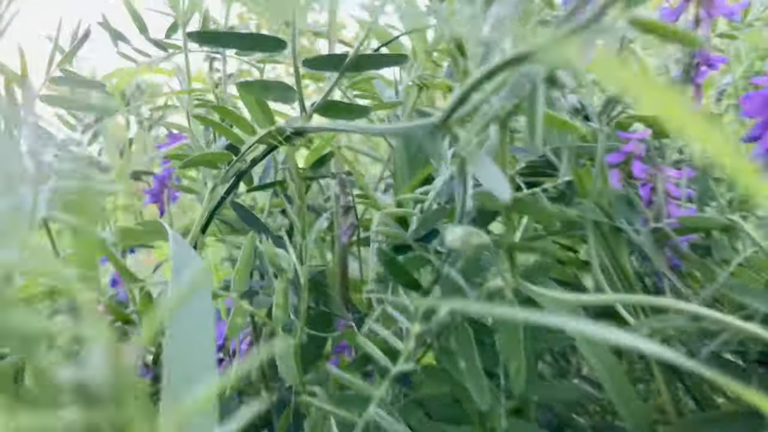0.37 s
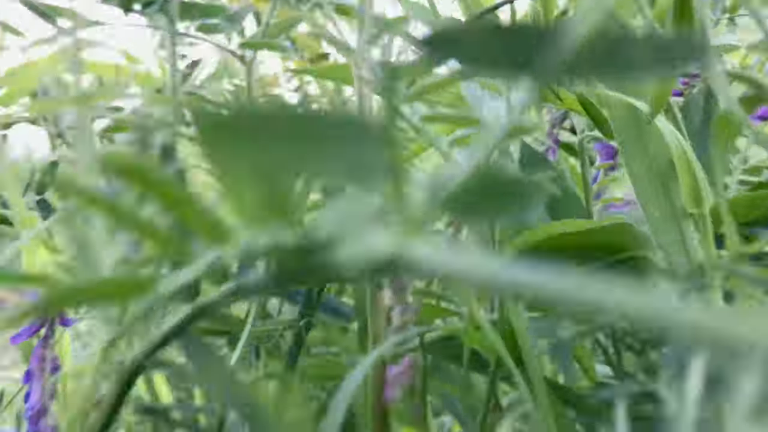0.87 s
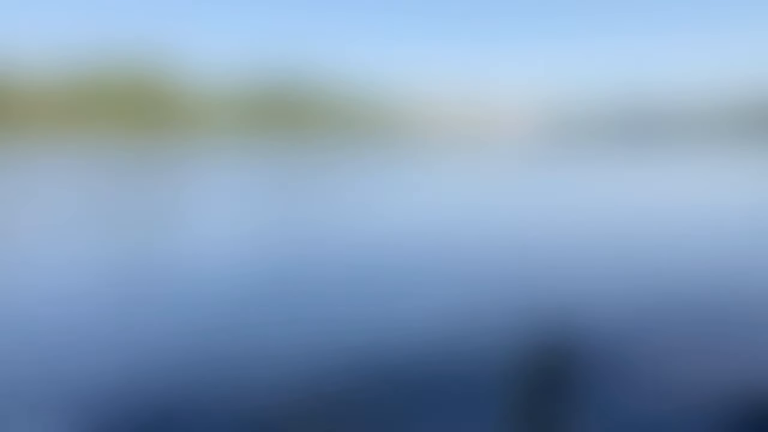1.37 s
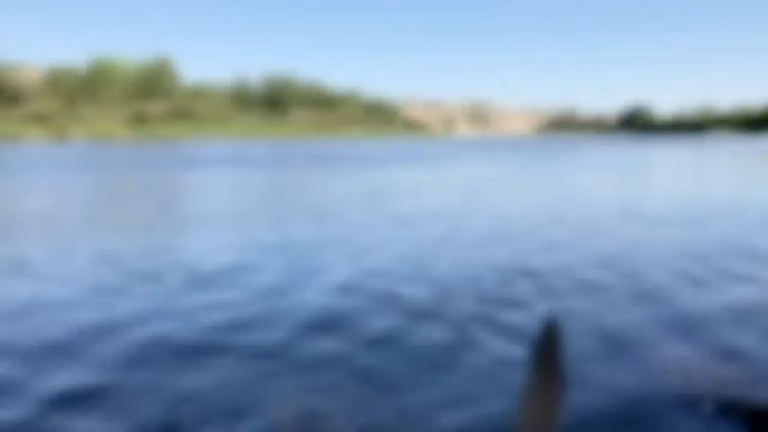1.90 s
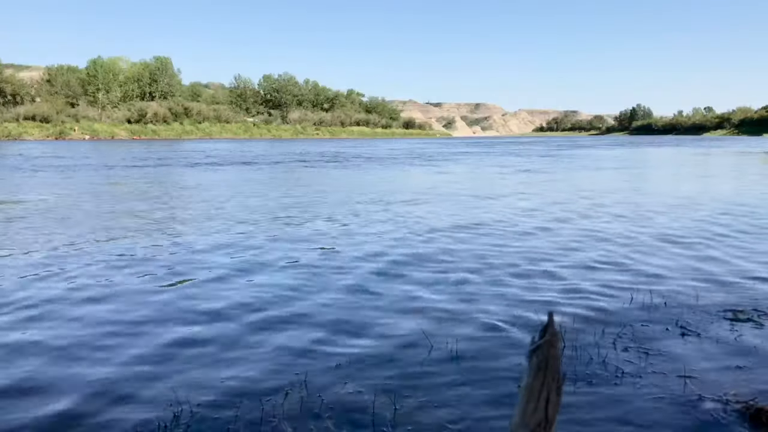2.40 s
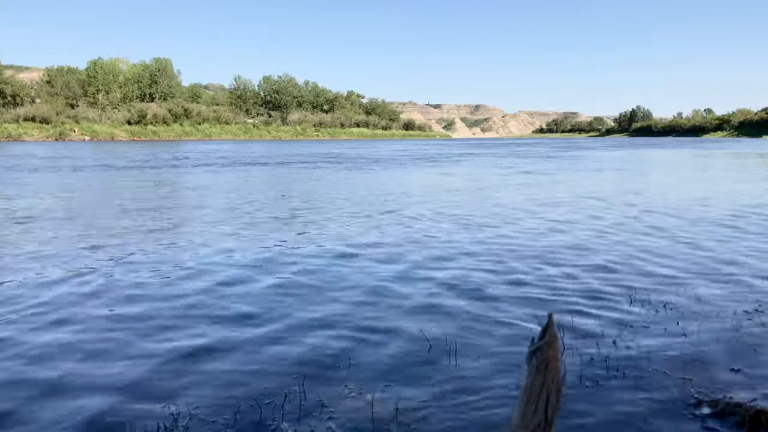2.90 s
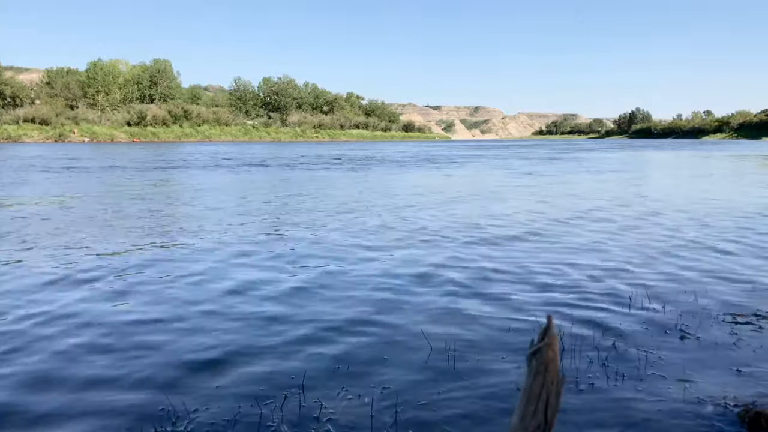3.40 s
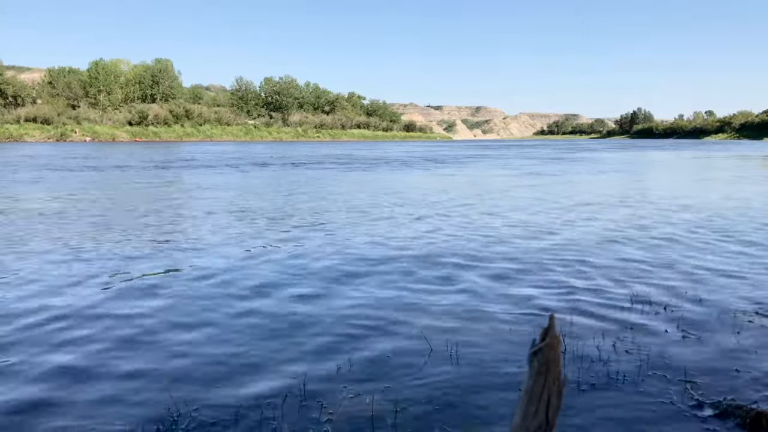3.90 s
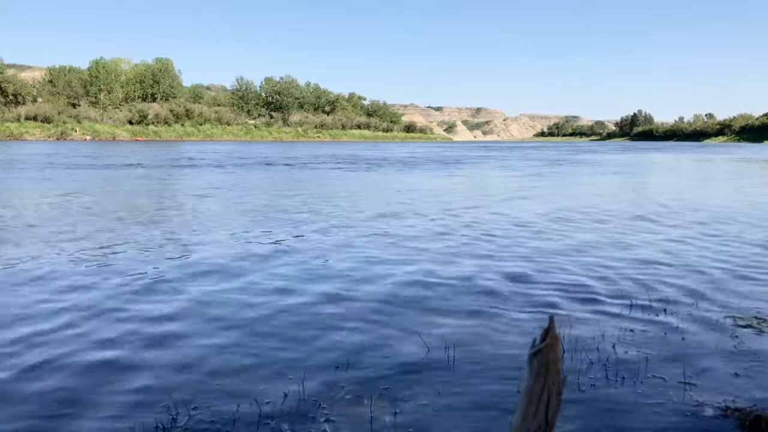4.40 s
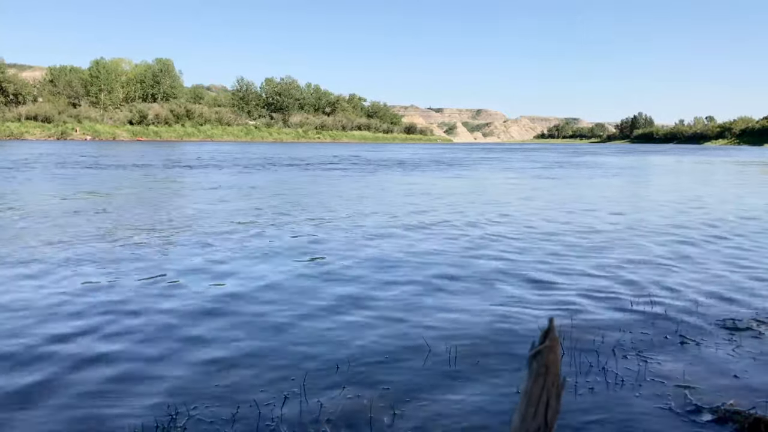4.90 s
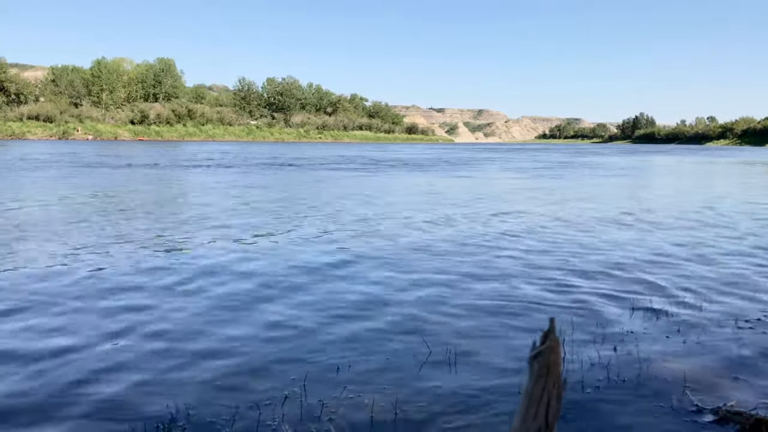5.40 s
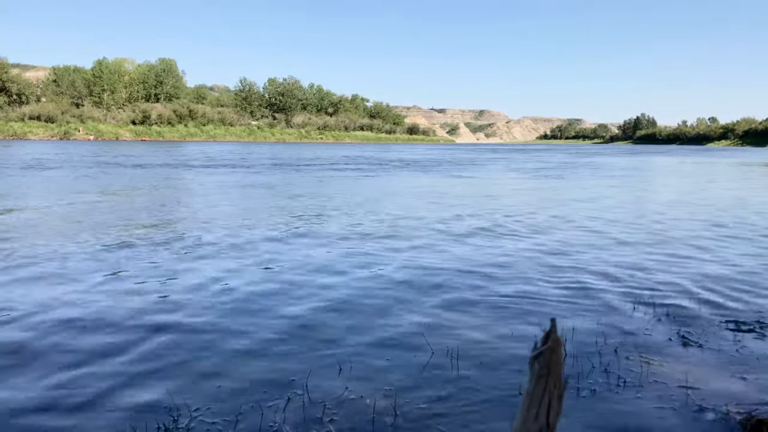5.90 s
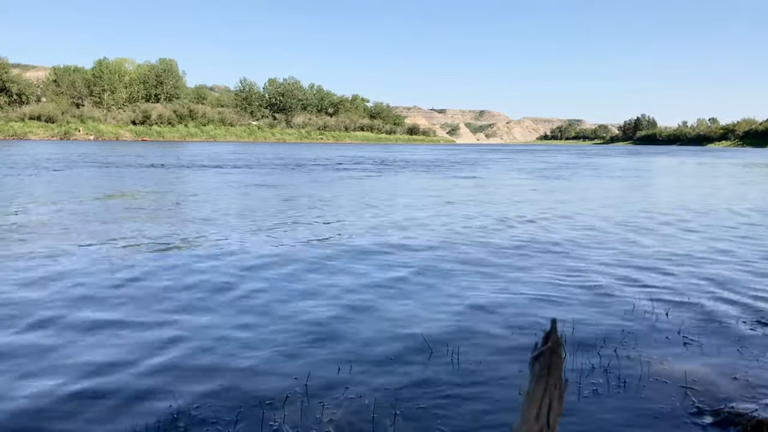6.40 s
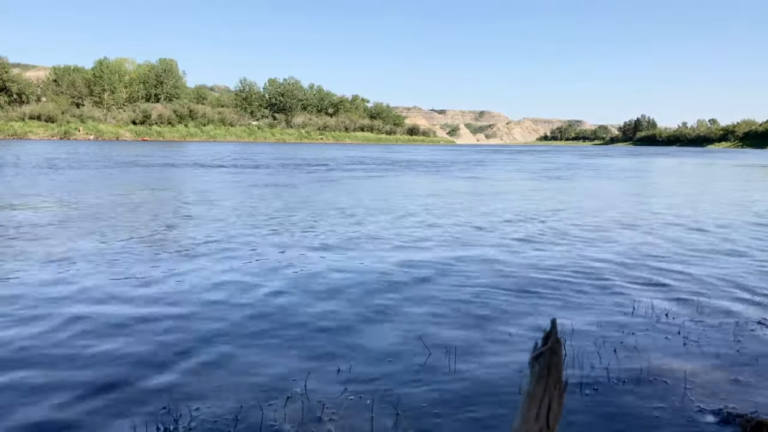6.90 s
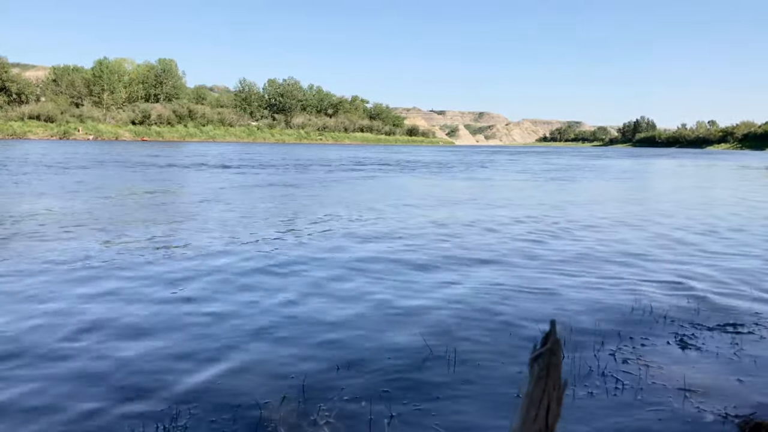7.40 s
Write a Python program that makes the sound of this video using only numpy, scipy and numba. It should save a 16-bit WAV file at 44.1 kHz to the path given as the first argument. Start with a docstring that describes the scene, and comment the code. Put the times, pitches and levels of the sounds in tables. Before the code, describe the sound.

Wind buffets a microphone pushed through rustling plants for a second, cuts off, then shallow river water trickles, gurgles and plinks close by.

```python
"""A shallow river edge in stereo, close to the microphone: patchy noise for the hiss, damped gliding sines for
the bubbles, plinks and plops, low gurgles by a stump on the left, one faint bird note, a distant low drone.
Before it, for about a second and in mono, the hand-held microphone is pushed through tall plants in wind:
shaped noise and damped sines for the air that buffets it and the leaves that rustle and tick on its case. Then
the scene changes: the plants break off and, after a moment of near silence, the river fades in quickly."""
import sys
import numpy as np
from scipy import signal
from scipy.fft import rfft, irfft, next_fast_len
from scipy.io import wavfile
from scipy.ndimage import uniform_filter1d, map_coordinates
from numba import njit

SR = 44100
rng = np.random.default_rng(int(sys.argv[2]) if len(sys.argv) > 2 else 0)


def elevation(decibels):
    """Turn decibel levels (scalar or array-like) into linear amplitude ratios."""
    levels = np.asarray(decibels, float)
    return 10 ** (levels / 20)


def dump(signal):
    """Clip the signal to [-1, 1] and save it as 16-bit WAV at the path in sys.argv[1]."""
    limited = np.clip(np.atleast_2d(signal).T, -1, 1)
    pcm = np.round(limited * 32767).astype(np.int16)
    wavfile.write(sys.argv[1], SR, pcm)


N = 332514
T = np.arange(N) / SR


def unit(x):
    """Scales to rms 1."""
    return x / np.sqrt(np.mean(x ** 2) + 1e-20)


def along(points, hz):
    """Reads (Hz, value) points on a log frequency axis."""
    f, v = np.transpose(points)
    return np.interp(np.log(hz + 1), np.log(f + 1), v, left=v[0], right=v[-1])


def curves(rows):
    """Gives one value per sample for each column after the time."""
    s, *columns = np.transpose(rows)
    return [np.interp(T, s, column) for column in columns]


def wobble(rate):
    """A smooth random curve with rate knots a second."""
    knots = rng.standard_normal(int(N * rate / SR) + 4)
    return map_coordinates(knots, [T * rate])


def filtered(x, response):
    """Multiplies the spectrum of x by a response of frequency."""
    m = next_fast_len(N + 8192)
    return irfft(rfft(x, m) * response(np.fft.rfftfreq(m, 1 / SR)), m)[..., :N]


def rush(spectrum, alike, patchy_db):
    """Turbulence: stereo noise of rms 1 with brief, tall patches of random gain."""
    z = signal.stft(rng.standard_normal((2, N)), nperseg=256)[2]
    field = uniform_filter1d(rng.standard_normal(z.shape[1:]), size=24, axis=0)  # tall in frequency
    field = uniform_filter1d(field, size=3, axis=1)  # brief in time
    pair = signal.istft(z * elevation(patchy_db * unit(field)), nperseg=256)[1][:, :N]

    def mid_side_response(hz):
        turn = np.arccos(np.clip(along(alike, hz), -1, 1)) / 2
        return elevation(along(spectrum, hz)) * [np.cos(turn), np.sin(turn)]

    mid, side = filtered(pair, mid_side_response)
    return unit(np.array([mid + side, mid - side]))


@njit
def add(out, start, left, right, step, glide, curl, decay, attack, phase, lead):
    """Sums damped sines whose pitch glides, then curls up; times in samples, pitch in radians a sample."""
    for k in range(len(start)):
        for i in range(min(int(7 * decay[k]), out.shape[1] - start[k])):
            reach = 2 * decay[k]
            turn = step[k] * i * (1 + curl * (i / decay[k]) ** 3 / 4)
            turn += glide[k] * reach * (i - reach * (1 - np.exp(-i / reach)))
            v = np.exp(-i / decay[k]) * (1 - np.exp(-i / attack[k]))
            out[0, start[k] + i] += left[k] * v * np.sin(turn + phase[k] + lead[k])
            out[1, start[k] + i] += right[k] * v * np.sin(turn + phase[k] - lead[k])


def rings(s, db, hz, glide_hz, decay_s, pan_db, soft, curl=0):
    """Bubbles and taps: each a damped sine whose swell lasts the share soft of its decay time."""
    out, one = np.zeros((2, N)), np.ones(len(s))
    radians = 2 * np.pi / SR
    lead = 0.038 * pan_db * one  # radians: the nearer, louder port also hears it first
    soft = max(soft, 1e-3)
    peak = (1 + 1 / soft) ** soft * (1 + soft)  # undoes the loss of height that the swell causes
    left = peak * elevation(db + pan_db / 2)
    right = peak * elevation(db - pan_db / 2)
    decay = decay_s * one * SR
    phase = 2 * np.pi * rng.random(len(s))
    add(out, (s * SR).astype(np.int64), left, right, hz * radians, glide_hz * one * radians / SR,
        float(curl), decay, soft * decay, phase, lead)
    return out


def bursts(s, db, decay_s):
    """An envelope that jumps at each time and dies away."""
    spikes = np.bincount((s * SR).astype(int), elevation(db), N)
    return signal.lfilter([1], [1, -np.exp(-1 / (decay_s * SR))], spikes)


def swells(s, height, width_s):
    """A smooth hump around each time, within the first second only."""
    head = T[:SR + 1]
    humps = (height[:, None] * np.exp(-((head - s[:, None]) / width_s) ** 2)).sum(axis=0)
    return np.pad(humps, (0, N - len(head)))


# Wind on the microphone. Each row: time in seconds, strength in dB ahead of the wobble and microphone response.
WIND = [(0.0, -59.5), (0.09, -27.5), (0.198, -29), (0.216, -25.5), (0.288, -32.5), (0.32, -26.5),
        (0.36, -30.5), (0.488, -29.5), (0.516, -27), (0.598, -27.5), (0.628, -39), (0.696, -25),
        (0.772, -39.5), (0.832, -22), (0.878, -49), (0.956, -26.5), (0.97, -36)]
# Sudden eddies that slap the port. Each row: time in seconds, peak in dB and peak of the sharper ripple on it
# in dB, both ahead of the microphone response.
SLAPS = [(0.094, -23.5, -44), (.13, -21, -38.5), (.167, -21, -33), (0.198, -43, -34), (0.214, -18, -27.5),
         (0.248, -26, -34.5), (.264, -23.5, -35), (.32, -19.5, -28.5), (0.367, -28.5, -54),
         (0.384, -35, -42), (.428, -33, -34), (.452, -32, -48), (0.499, -40, -33.5), (.518, -20.5, -27.5),
         (.525, -40, -29), (0.556, -43, -45), (.686, -26.5, -50), (0.814, -34, -60), (.829, -22.5, -49),
         (.906, -36.5, -52), (.946, -24.5, -39.5)]
# Tone of the air: deep buffets, faster eddies, their whisking top.
# Each row: frequency in Hz, relative level in dB per Hz.
BUFFET = [(15, -42), (25, -9), (43, -2), (64, 3), (150, -11.5), (200, -35), (330, -120)]
EDDIES = [(60, -43), (130, -5), (200, -0.5), (330, -5), (450, -22), (700, -38)]
WHISK = [(200, -38), (380, -7.5), (520, 1.5), (750, -10), (1100, -27), (2000, -51)]
# Fast eddies lie under the mean wind, die down as the plants close in and swell around each slap.
EDDY_DB, EDDY_DB_PER_S, EDDY_MEAN_S, SWELL_S, SWELL_DB = -8, -8, 0.11, 0.012, -5
SLAP_HZ, RIPPLE_HZ, SLAP_RISE_S = 177, 410, 0.0045
OVERLOAD = 0.18  # amplitude near which the microphone flattens pushes


def wind():
    """Air buffets the port: noise that reaches higher in stronger eddies, slaps as heavily damped sines."""
    mono = [(100, 1)]
    slow_db, = curves(WIND)
    s, db, ripple_db = np.transpose(SLAPS)
    calm_db = uniform_filter1d(slow_db, int(EDDY_MEAN_S * SR)) + EDDY_DB + EDDY_DB_PER_S * T
    slap_swell = swells(s + SLAP_RISE_S / 2, elevation(ripple_db + SWELL_DB), SWELL_S)
    fast_db = 20 * np.log10(elevation(calm_db) + slap_swell)
    lumps = wobble(45.1)
    air = elevation(slow_db + 1.8 * wobble(20.5)) * rush(BUFFET, mono, patchy_db=1.1)
    air += elevation(fast_db - 4 + 2.0 * lumps) * rush(EDDIES, mono, patchy_db=2.1)
    air += elevation(1.41 * fast_db - 2.5 + 5.0 * lumps) * rush(WHISK, mono, patchy_db=-0.6)
    air += rings(s - SLAP_RISE_S, db, SLAP_HZ + 0 * s, 0, 0.0033, 0, soft=3.0)
    air += rings(s - SLAP_RISE_S / 2, ripple_db, RIPPLE_HZ + 0 * s, 0, 0.0021, 0, soft=3)
    # the microphone loses the slowest pushes, and moving air has no sharp edges
    air = filtered(air, lambda f: 1 / (1 + (42 / (f + 1)) ** 4) / (1 + (f / 1100) ** 4))
    return air / (1 + (air / OVERLOAD) ** 4) ** (1 / 4)


# Leaves flick the case. Each row: start in seconds, peak in dB, pitch in Hz.
TICKS = [(.054, -47, 10590), (.184, -36.5, 6440), (.2129, -44, 8650), (.453, -47, 6890), (.509, -44, 10340),
         (.5276, -40, 9100), (.536, -39, 6500), (.5836, -45.5, 1380), (.6026, -45, 7100),
         (.6195, -47, 15250), (.7251, -38.5, 14600), (.8224, -44, 4420), (.9039, -42.5, 2950)]
# Stems drag along the case. Each row: time in seconds, extra level in dB.
LEAVES = [(.4, 2.5), (.53, 3), (.61, 3.5), (.72, 4), (.79, 1.5), (.91, 0.5), (.97, 5)]
# Tone of the rustle. Each row: frequency in Hz, relative level in dB per Hz.
RUSTLE = [(530, -3), (900, 0.5), (1320, -3.5), (3110, -2.5), (4860, -5.5), (5480, -5), (14900, -12),
          (16000, -15)]
TICK_S, TICK_SLOPE = 0.00047, -0.47  # decay at 7 kHz, its power of pitch
LEAF_DB, LEAF_DB_PER_S, DRAG_S = -63.3, 4.5, 0.034  # the rustle grows as the microphone pushes in


def leaves():
    """Leaves at the case: short damped sines tick, each with a burst of scrape, over rustling noise."""
    s, db, hz = np.transpose(TICKS)
    ticks = rings(s, db, hz, 0, TICK_S * (hz / 7000) ** TICK_SLOPE, 0, soft=0.27)
    leaf_db = LEAF_DB + LEAF_DB_PER_S * T + swells(*np.transpose(LEAVES), DRAG_S)
    scrape = elevation(leaf_db + 0.88 * wobble(92.4)) + bursts(s, db - 9.0, 0.0021)
    return ticks + scrape * rush(RUSTLE, [(100, 1)], patchy_db=2.0)


def swarm(count, centre_hz, octaves, cycles, spread_db, width_db, clump, lean_db=1):
    """Random bubbles of rms 1, in clumps; the pitch rises a little as each one surfaces."""
    u, z = rng.random((count, 2)), rng.standard_normal((count, 3))
    odds = np.cumsum(np.exp(clump * wobble(25)))
    s = np.interp(u[:, 0] * odds[-1], odds, T)
    hz = np.clip(450 + centre_hz * 2 ** (octaves * z[:, 0]), 0, 16000)
    decay_s = cycles * 2 ** (0.86 * z[:, 1]) / hz
    size_db = np.minimum(-spread_db * np.log(u[:, 1]), 2.53 * spread_db)
    pan_db = lean_db + width_db * z[:, 2]
    return unit(rings(s, size_db, hz, 0.058 * hz / decay_s, decay_s, pan_db, soft=0.15))


# The river's flow. Each row: time in seconds, level in dB ahead of the offsets and ripples below.
RIVER = [(1.05, -52.5), (1.25, -52), (1.47, -53), (2.13, -54), (2.33, -53), (2.48, -52), (2.64, -53),
         (3.2, -53), (3.51, -51.5), (3.6, -53.5), (4.0, -53.5), (4.16, -51.5), (4.36, -53.5), (5.33, -52),
         (6.07, -53), (6.47, -53.5), (6.67, -51), (6.83, -52.5), (7.3, -53.5), (7.54, -53.5)]
# Tone of the stream and of the finer spray. Each row: frequency in Hz, relative level in dB per Hz.
STREAM = [(250, -29), (430, -8.5), (620, 1), (1000, 1), (1740, 1), (2500, 3), (3600, -5.5), (6000, -34)]
SPRAY = [(1500, -22), (3000, 4.5), (4400, 2), (9000, 0.5), (12000, -1), (15000, -3.5), (17000, -6)]
# How alike the two ports hear the water and the breeze.
# Each row: frequency in Hz, left-right likeness from -1 to 1.
ALIKE = [(60, -0.74), (130, -0.12), (290, -0.24), (640, 0.99), (1410, 0.81), (3100, 0.76), (6820, 0.95),
         (15000, 1)]
STREAM_DB, SPRAY_DB = 1.83, -2.5  # over the flow level


def stream_and_spray():
    """The river's bed of sound: patchy noise for hiss and mist, under swarms of bubbles, large to tiny."""
    flow_db, = curves(RIVER)
    ripple, patter = wobble(13), wobble(70)
    hiss = 0.5 * elevation([[0.6], [-0.6]]) * rush(STREAM, ALIKE, patchy_db=2)
    plops = 0.69 * swarm(count=6000, centre_hz=1346, octaves=0.762, cycles=4.1,
                         spread_db=3.5, width_db=5, clump=0.35)
    plops += 0.19 * swarm(count=260, centre_hz=169.4, octaves=0.852, cycles=6.6,
                          spread_db=3.5, width_db=1.0, clump=0.5, lean_db=9.5)
    mist = 0.67 * elevation(1.03 * patter + 1.54 * wobble(250)) * rush(SPRAY, ALIKE, patchy_db=2.5)
    fizz = 0.5 * swarm(count=6000, centre_hz=7100, octaves=0.64, cycles=1.43,
                       spread_db=9.5, width_db=-2.5, clump=0.8)
    fizz += 0.5 * swarm(count=1500, centre_hz=4208, octaves=0.6, cycles=7.9,
                        spread_db=4.5, width_db=9.0, clump=0.6)
    stream = elevation(STREAM_DB + flow_db + 1.05 * ripple + 1.03 * patter) * (hiss + plops)
    spray = elevation(SPRAY_DB + flow_db + 0.99 * ripple) * (mist + fizz)
    return stream + spray


# Tone of the distant drone. Each row: frequency in Hz, relative level in dB per Hz.
DRONE = [(60, -20), (110, -0.5), (170, 3.5), (240, 1.5), (400, -28)]


def drone():
    """A distant low drone: wavering low noise that draws nearer, 3 dB louder each second."""
    return elevation(-89 + 3 * T + 2.0 * wobble(3.024)) * rush(DRONE, [(100, 0.16)], patchy_db=0.0)


# Tone of the light air. Each row: frequency in Hz, relative level in dB per Hz.
BREEZE = [(15, -14), (28, 2.5), (60, 1), (120, -11), (300, -21), (600, -33)]


def breeze():
    """Light air: low noise that moves the two ports partly against each other."""
    return elevation(-68.5 + 1.1 * wobble(4.66)) * rush(BREEZE, ALIKE, patchy_db=0.0)


# Large trapped bubbles. Each row: start in seconds, peak in dB ahead of the tremble, pitch in Hz, initial glide
# in Hz per second.
GURGLES = [(1.031, -47, 860, 990), (1.157, -47, 507, -2000), (1.191, -64, 435, 360), (1.23, -52, 756, 1800),
           (1.397, -53, 497, 100), (1.558, -46.5, 702, 4600), (1.79, -46, 1320, -2200),
           (1.802, -51.5, 423, 350), (1.84, -67, 426, 1100), (1.97, -57, 406, 1800),
           (2.173, -55, 601, -3600), (2.213, -48, 845, -740), (2.259, -43.5, 1090, 4700),
           (2.345, -45, 753, 7500), (2.425, -55, 424, 480), (2.52, -58, 462, 1500),
           (2.596, -51.5, 459, 100), (2.63, -53, 483, 2200), (2.686, -48, 471, 1500),
           (2.712, -49, 787, -2600), (2.713, -42.5, 1055, 14000), (2.726, -55, 452, 3300),
           (2.775, -56, 470, 1500), (2.947, -45.5, 950, -2500), (3.037, -53, 585, -250),
           (3.08, -46.5, 435, -720), (3.093, -51.5, 663, -2600), (3.15, -58, 453, 1200),
           (3.36, -46.5, 378, 3400), (3.48, -50, 531, -1260), (3.564, -51.5, 623, -1200),
           (3.574, -50, 1092, 3800), (3.694, -47, 731, 2400), (3.722, -51, 830, -1050),
           (3.825, -46.5, 705, -450), (3.869, -49, 590, -200), (3.989, -59.5, 474, 100),
           (4.0, -52.5, 735, 1200), (4.157, -49, 1123, 3000), (4.192, -47, 890, 4500),
           (4.25, -44, 320, 1350), (4.335, -57, 396, 1802), (4.454, -55.5, 690, 600),
           (4.5, -48, 530, -1600), (4.56, -65, 475, 1600), (4.608, -55, 594, 3400),
           (4.614, -49.5, 434, 600), (4.668, -56, 420, 2600), (4.749, -43.5, 500, 100),
           (4.83, -56, 519, 2600), (4.863, -47.5, 360, 280), (4.987, -49.5, 610, 5600),
           (5.026, -48.5, 1080, 1500), (5.138, -54.5, 389, -900), (5.144, -47.5, 648, 2200),
           (5.31, -57, 466, 670), (5.324, -54, 463, 960), (5.37, -51.5, 842, 100), (5.396, -56, 457, 98),
           (5.4, -43.5, 995, -3000), (5.43, -51, 628, -3200), (5.559, -44.5, 1275, 100),
           (5.571, -49, 364, 2200), (5.603, -44.5, 455, 2600), (5.647, -43.5, 527, -1140),
           (5.697, -57, 410, -360), (5.725, -48, 423, 1100), (5.769, -49, 778, 340),
           (5.801, -49.5, 410, 2500), (5.88, -58.5, 468, 700), (5.901, -43, 1003, 6000),
           (5.929, -54, 588, 2250), (5.948, -53, 904, 2200), (5.956, -48.5, 582, -1140),
           (6.262, -54, 1013, 2800), (6.268, -38, 613, 2800), (6.499, -63, 392, 240),
           (6.537, -49, 923, 3300), (6.538, -57, 630, 1800), (6.612, -48, 1070, 400),
           (6.651, -48.5, 507, 4300), (6.661, -42.5, 860, -1700), (6.763, -56.5, 520, -960),
           (6.803, -49, 1026, 2900), (6.807, -48, 530, 1850), (6.83, -52, 662, -260),
           (6.876, -44, 1050, -1500), (6.915, -58, 558, 1800), (6.932, -52, 625, 1130),
           (6.984, -51, 478, 2700), (7.056, -50.5, 1040, 4300), (7.082, -47, 534, 1700),
           (7.263, -54, 762, 100), (7.371, -47, 1090, 2000), (7.372, -43.5, 692, -1750),
           (7.393, -45, 533, 2500), (7.52, -49, 583, 1800), (7.533, -41.5, 610, 1500),
           (7.533, -43, 1320, 100)]
# T60 of a gurgle of 500 Hz and -50.5 dB; higher and harder ones die sooner (power of pitch, share per dB).
GURGLE_T60_S, GURGLE_SLOPE, GURGLE_PER_DB = 0.17, -0.75, -0.0353
STUMP_PAN_DB, PAN_DB_PER_OCTAVE = 5.5, -3  # the 500 Hz ones sit left by the stump, higher ones nearer the middle


def gurgles():
    """Large bubbles by the stump: gliding damped sines that tremble, with a short splash of noise."""
    s, db, hz, glide_hz = np.transpose(GURGLES)
    t60_s = GURGLE_T60_S * (hz / 500) ** GURGLE_SLOPE * np.exp(GURGLE_PER_DB * (db + 50.5))
    pan_db = STUMP_PAN_DB + PAN_DB_PER_OCTAVE * np.log2(hz / 500) + 0.99 * rng.standard_normal(len(s))
    notes = rings(s, db, hz, glide_hz, t60_s / np.log(1000), pan_db, soft=0.033, curl=0.0062)
    # the surface above a big bubble keeps moving, so its note trembles
    notes *= elevation(2 * wobble(120))
    # higher ones come from water folding over, so their splash is stronger
    splash = bursts(s, db - 8.5 + 6 * np.log2(hz / 700), 0.0071)
    return notes + splash * rush(STREAM, ALIKE, patchy_db=5)


def faint_plinks():
    """Rows of fainter pops at random times, in the columns of PLINKS."""
    z = rng.standard_normal((120, 4))
    s = rng.uniform(FADE_TO_S, T[-1], len(z))
    hz = np.clip(5180 * 2 ** (0.99 * z[:, 0]), 1300, 15400)
    decay_ms = 1000 * 4.4 * 2 ** (0.45 * z[:, 1]) / hz  # around 4.4 cycles
    return np.transpose([s, -43.5 + 2.3 * z[:, 2], hz, decay_ms, 2.0 + 4.1 * z[:, 3]])


# The clearest small bubbles that pop near the microphone. Each row: start in seconds, peak in dB, pitch in Hz,
# decay in ms, left over right in dB.
PLINKS = [(1.0403, -38.5, 4820, .5, -3), (1.0779, -40, 3490, .9, 2), (1.1066, -36, 10250, 0.43, 4),
          (1.1363, -37, 10500, .45, 2), (1.2332, -41.5, 6460, .45, 0), (1.3608, -37.5, 8900, 0.64, 2),
          (1.5539, -42, 3660, .9, 7), (1.5644, -37.5, 3060, .65, 2), (1.7188, -30.5, 9470, .2, 0),
          (1.7945, -40.5, 2870, 1.8, -3), (1.8632, -32, 6660, 0.56, 5), (1.8763, -34, 8550, .35, -3),
          (1.963, -38.5, 1430, 2.6, 1), (2.0083, -37.5, 4480, 0.69, 4), (2.0247, -43.5, 2580, 5.3, 1),
          (2.1464, -38.5, 5160, 1.1, -2), (2.218, -39.5, 2440, 2, 4), (2.2311, -38.5, 9820, 0.87, 2),
          (2.2802, -30.5, 4480, .35, -3), (2.3457, -35.5, 9350, 0.32, -1), (2.4578, -37.5, 2520, 0.97, 9),
          (2.5057, -38.5, 4390, 0.51, 0), (2.591, -40, 6800, .6, 0), (2.67, -36, 9470, .45, -2),
          (2.8363, -39, 11280, 0.24, 3), (2.9151, -30.5, 4570, 0.55, -4), (2.939, -32.5, 5500, 1, 2),
          (2.9965, -32, 9220, .2, 1), (3.0712, -39, 2200, 2.8, 3), (3.0797, -38, 8870, .6, 5),
          (3.1873, -41, 5900, 1.1, 4), (3.2687, -32, 4500, 1.7, 1), (3.2778, -34.5, 9500, .7, -7),
          (3.3028, -36.5, 2420, 1.2, 1), (3.3269, -40, 1860, 1.5, 3), (3.3323, -34.5, 12140, .2, 4),
          (3.3632, -35.5, 6120, .45, 7), (3.3745, -34.5, 4480, .55, -5), (3.3943, -34, 8350, .6, 0),
          (3.4703, -37.5, 1680, 2, -2), (3.4734, -37.5, 3500, .9, 3), (3.48, -36, 8010, 0.31, 4),
          (3.5355, -37, 2200, 2, -4), (3.6364, -33, 8350, 0.42, 1), (3.6444, -31.5, 9500, 0.51, 1),
          (3.6503, -38.5, 1850, 2.4, 0), (3.671, -38.5, 2220, 1.2, -1), (3.7886, -33.5, 3740, 1.5, 3),
          (3.8278, -38, 8500, 0.6, -1), (3.8424, -35.5, 3170, 0.58, 3), (3.963, -36.5, 8700, 0.3, 2),
          (4.0013, -33, 9600, 0.42, -2), (4.163, -32.5, 6200, 0.39, 3), (4.3428, -41, 3020, 1.2, 0),
          (4.3434, -34, 5030, 1, 5), (4.35, -30.5, 4300, 0.33, 5), (4.357, -37, 7670, .15, 13),
          (4.366, -39.5, 3840, 1, 3), (4.4175, -33.5, 5130, 0.96, 3), (4.463, -37, 5600, 0.64, 0),
          (4.5674, -39, 9040, .55, 4), (4.7212, -38, 2520, 1.1, 3), (4.772, -37, 4000, .7, 2),
          (4.782, -33.5, 8200, 0.38, -3), (4.8223, -33.5, 6330, 0.65, 4), (4.8747, -37, 2820, 0.92, 0),
          (4.8811, -33.5, 12800, .35, 4), (4.9373, -33, 8800, 0.4, 5), (4.947, -33, 6450, .3, 7),
          (5.0423, -35.5, 12830, 0.41, 3), (5.2027, -39, 4500, 1.2, 3), (5.4524, -37.5, 1890, 2.4, -1),
          (5.4951, -36, 6550, 0.19, 5), (5.5475, -35, 9820, 0.27, 5), (5.6097, -37.5, 3490, 0.76, 7),
          (5.6101, -31, 12200, 0.33, -4), (5.668, -34, 13950, 0.55, 0), (5.7901, -37, 14990, .16, 2),
          (5.837, -38.5, 6160, 0.63, 1), (6.113, -39.5, 8700, 0.74, 3), (6.1914, -37.5, 2930, 1.3, -1),
          (6.224, -34, 5600, 0.5, -5), (6.2677, -32, 7060, 0.17, 0), (6.27, -32, 1280, 0.78, 0),
          (6.2783, -33.5, 13100, 0.22, -8), (6.3423, -35, 3770, 0.64, -1), (6.466, -30.5, 7800, 0.23, -4),
          (6.4667, -40.5, 2230, 1.9, -1), (6.632, -36, 10510, .27, 0), (6.643, -32, 10600, 0.49, 3),
          (6.76, -31.5, 7800, 0.32, -3), (6.8298, -35.5, 1280, 0.87, 3), (6.8786, -40.5, 2540, 1.1, 3),
          (6.973, -39, 7740, 0.31, 0), (7.0273, -33, 8610, .47, 4), (7.2976, -35, 10160, 0.15, 8),
          (7.3723, -38, 1240, 1.1, 6), (7.4989, -32, 13000, 0.29, -2), (7.5134, -36, 10000, .24, 3)]


def plinks():
    """Small bubbles pop: each a damped sine of rising pitch, and a snap of noise as its film bursts."""
    s, db, hz, decay_ms, pan_db = np.vstack([PLINKS, faint_plinks()]).T
    decay_s = decay_ms / 1000
    # each starts a little under its pitch and rises through it
    pops = rings(s, db, 0.978 * hz, 0.025 * hz / decay_s, decay_s, pan_db, soft=0.27)
    return pops + bursts(s, db - 9.5, 0.0018) * rush(SPRAY, ALIKE, patchy_db=1.0)


# One faint bird note. Each row: time in seconds, pitch in Hz, rms level in dB midway between the two ports.
BIRD = [(1.945, 3950, -70), (1.97, 3910, -61), (2.03, 3870, -59), (2.058, 4050, -58), (2.072, 3800, -60),
        (2.088, 3100, -65), (2.095, 2900, -75)]


def bird():
    """A thin whistle, a sine that bends down at its end, a little right of the middle."""
    hz, db = curves(BIRD)
    on = (T > BIRD[0][0]) & (T < BIRD[-1][0])
    whistle = np.sqrt(2) * on * elevation(db) * np.sin(2 * np.pi * np.cumsum(hz) / SR)
    return whistle * elevation([[-1.5], [1.5]])


# Wavelets that thud against the bank. Each row: start in seconds, peak in dB, pitch in Hz, left over right in dB.
THUDS = [(2.699, -61, 41, 2), (6.255, -55, 45.2, -1.5), (7.361, -62, 40.4, 3.0)]


def thuds():
    """Wavelets meet the bank: very low damped sines."""
    s, db, hz, pan_db = np.transpose(THUDS)
    return rings(s, db, hz, 0, 0.03, pan_db, soft=0.23)


PLANTS_END_S, FADE_FROM_S, FADE_TO_S = 0.971, 0.99, 1.033


def scene():
    """The plants, a moment of near silence, then the river edge fades in; a very faint steady hiss throughout."""
    plants = (wind() + leaves()) * np.clip((PLANTS_END_S - T) / 0.0012, 0, 1)
    river = stream_and_spray() + drone() + breeze() + gurgles() + plinks() + bird() + thuds()
    fade = np.clip((T - FADE_FROM_S) / (FADE_TO_S - FADE_FROM_S), 0, 1)
    return plants + fade * river + elevation(-105) * rng.standard_normal(N)


def band_limit(x):
    """A steep low-pass at the top of the band."""
    return signal.sosfilt(signal.butter(12, 16810, fs=SR, output="sos"), x)


def record(dry):
    """Band limit: nothing above 15850 Hz is passed on."""
    mix = filtered(dry, lambda hz: hz < 15850)
    return band_limit(mix)


dry = scene()
out = record(dry)
dump(out)
```